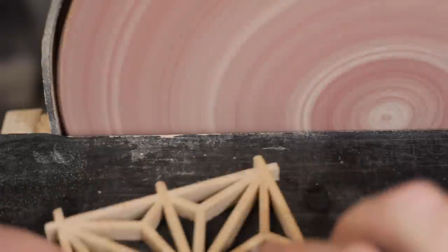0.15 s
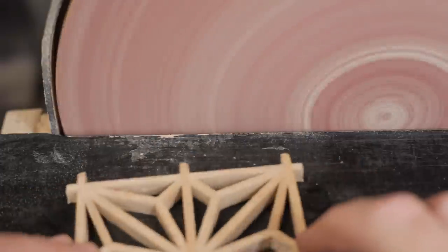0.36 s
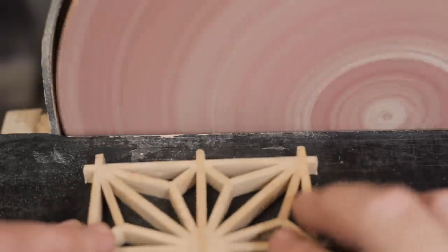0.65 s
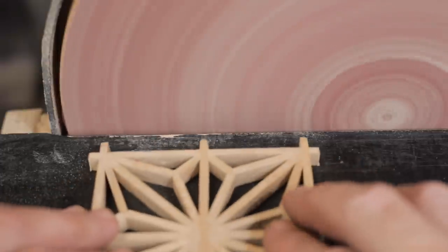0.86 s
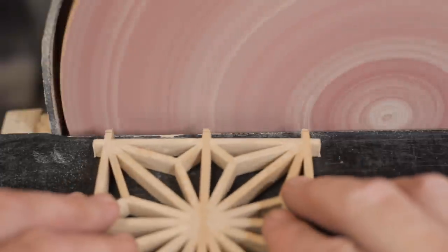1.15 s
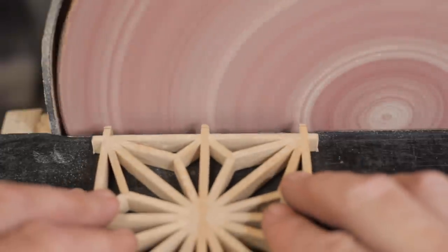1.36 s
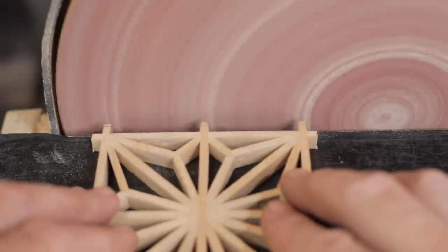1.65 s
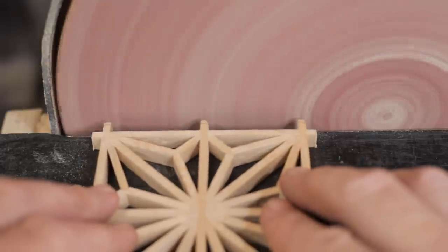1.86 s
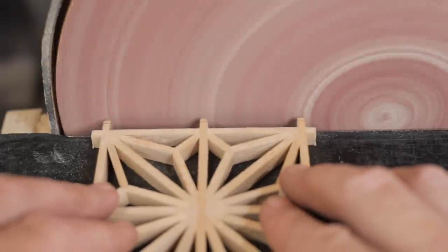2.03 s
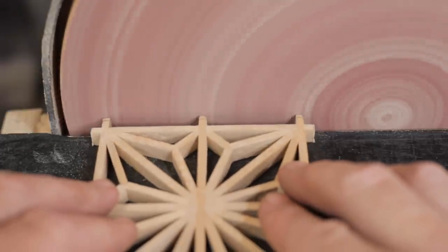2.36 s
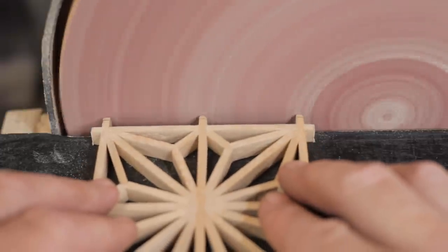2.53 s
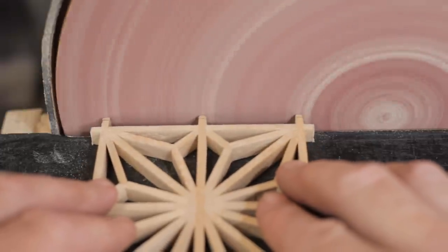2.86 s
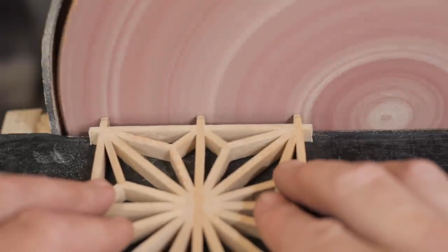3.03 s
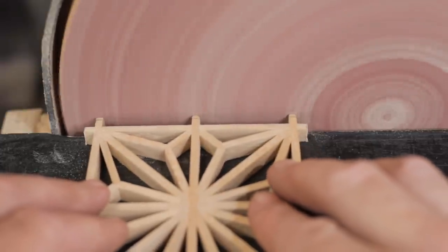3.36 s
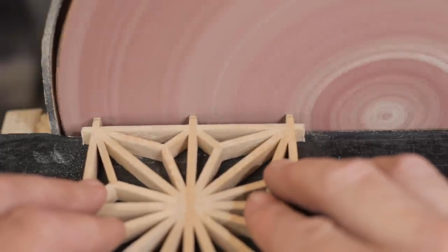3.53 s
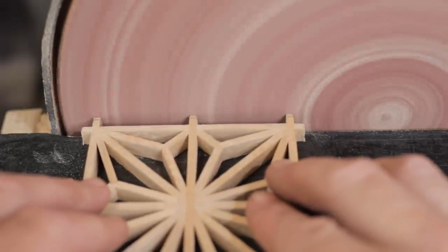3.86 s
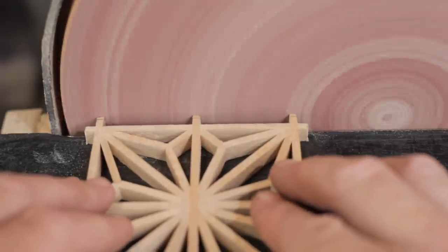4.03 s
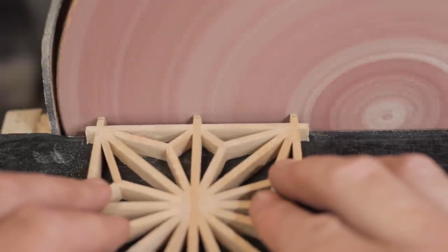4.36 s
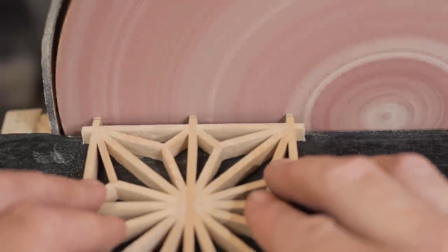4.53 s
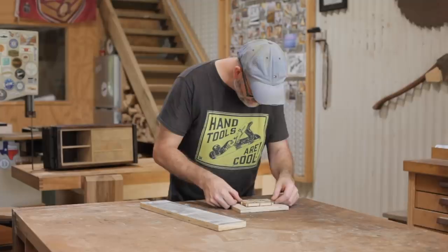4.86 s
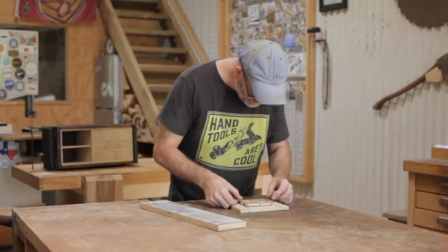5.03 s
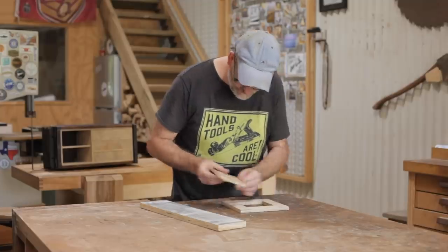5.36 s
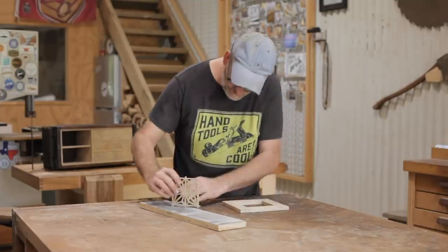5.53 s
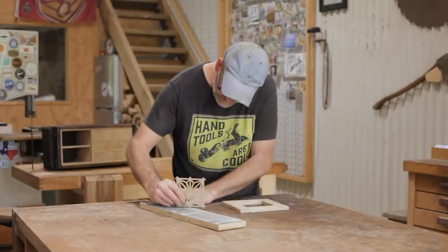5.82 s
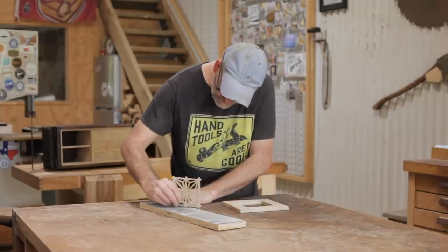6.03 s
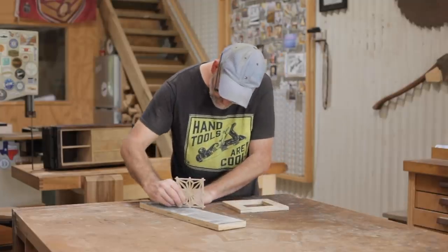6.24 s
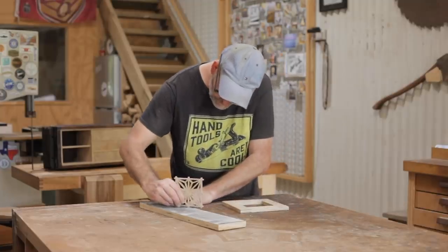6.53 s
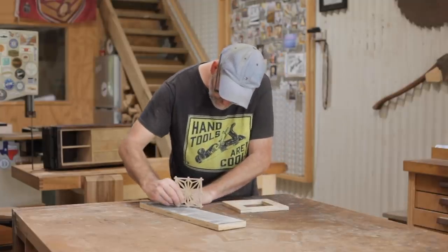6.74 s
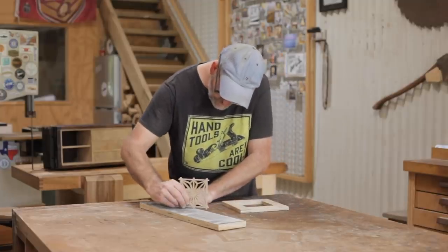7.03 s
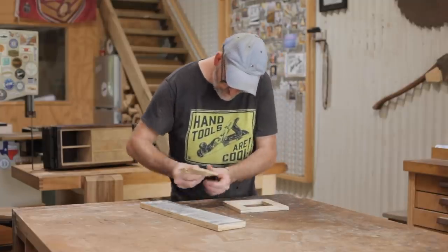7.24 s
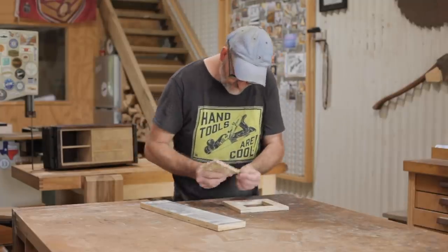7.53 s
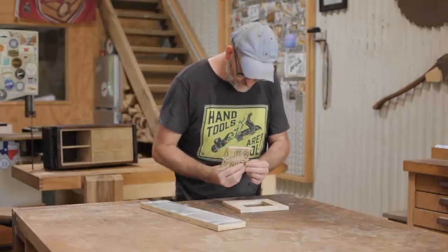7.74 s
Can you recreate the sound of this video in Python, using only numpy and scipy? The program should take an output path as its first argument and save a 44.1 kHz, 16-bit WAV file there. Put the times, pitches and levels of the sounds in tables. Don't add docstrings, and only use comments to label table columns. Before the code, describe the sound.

An idling sanding machine whirs up close with tiny bright crackles of wood sliding. Then loud gritty sanding bursts in, chattering evenly as the disc's high spot hits the thin wood. It cuts to a calm room with faint rumble and a fan winding down; a light frame is tapped on a board, rubbed to and fro by hand in quick raspy strokes, then flicked clean.

```python
import sys
import numpy as np
from scipy import signal
from scipy.fft import rfft, irfft, next_fast_len
from scipy.io import wavfile
from scipy.ndimage import uniform_filter1d, map_coordinates

SR = 44100
rng = np.random.default_rng(int(sys.argv[2]) if len(sys.argv) > 2 else 0)


def attenuation_scalar(level_db):
    decades = np.asarray(level_db, float) / 20
    return 10 ** decades


def to_wav(s):
    ch = np.atleast_2d(s).T
    pcm = np.round(np.clip(ch, -1, 1) * 32767)
    wavfile.write(sys.argv[1], SR, pcm.astype(np.int16))


N = 347949
TIME_S = np.arange(N) / SR
TURN_HZ = 13.17
FIRST_STRIKE_S = 2.289


def unit(x):
    return x / np.sqrt(np.mean(x ** 2) + 1e-20)


def along(points, hz):
    f, v = np.transpose(points)
    return np.interp(np.log(hz + 1), np.log(f + 1), v)


def curves(rows):
    s, *cols = np.transpose(rows)
    return [np.interp(TIME_S, s, c) for c in cols]


def wobble(rate_hz):
    knots = rng.standard_normal(int(N * rate_hz / SR) + 4)
    return map_coordinates(knots, [np.arange(N) * rate_hz / SR])


def filtered(x, response):
    m = next_fast_len(N + 8192)
    return irfft(rfft(x, m) * response(np.fft.rfftfreq(m, 1 / SR)), m)[:N]


def peaks(modes, hz):
    power = sum(attenuation_scalar(db) ** 2 / (1 + (2 * (hz - c) / w) ** 2) for c, w, db in modes)
    return np.sqrt(power)


def grains(spectrum, rough_db):
    white = rng.standard_normal(N) * attenuation_scalar(rough_db * wobble(900))
    return unit(filtered(white, lambda hz: attenuation_scalar(along(spectrum, hz))))


def swell(s, half_s, power):
    return np.cos(np.pi / 2 * np.clip((TIME_S - s) / half_s, -1, 1)) ** power


def motor():
    # multiple, level_db
    hum_orders = [(1, 0.65), (2, -15.5), (3, -27), (4.5, -21.5), (7, -20), (7.5, -19.5)]
    # freq_hz, level_db_per_hz
    whir_spectrum = [(35, -31.5), (72, -15), (102, -16.5), (150, -22), (344, -21), (700, -22.5),
                     (1200, -24), (1700, -16), (2700, -21), (3300, -13.5), (3470, -26), (4300, -33.5),
                     (6500, -41), (9800, -47.5), (16000, -51.5)]
    # freq_hz, width_hz, over_whir_db
    housing = [(239, 14.6, 13), (454, 5.7, 6.5), (529, 18, 8.5), (609.5, 29, 14.5), (739.4, 15, 12),
               (796, 12, 10.5), (928, 73, 8), (1002, 13, 11.5), (1088, 22, 14), (1160, 12, 7),
               (1290, 31, 16.5), (1420, 53, 5.5), (1590, 85, 6), (1800, 53, 2), (2050, 83, 6),
               (2410, 230, 3.5), (2840, 94, 9.5), (2990, 240, -2), (3540, 51, 4), (3720, 60, 10),
               (4020, 62, 9.5), (4410, 150, 7), (5870, 340, 6.5), (7000, 150, 8.5), (7780, 300, 6),
               (8200, 500, 6.5)]
    hum_hz, hum_db, sag_db, sag_s = 99.73, -35, -4.5, 0.43
    phase = 2 * np.pi * hum_hz * TIME_S + 2.55
    hum = sum(attenuation_scalar(db + .5 * k * wobble(12)) * np.cos(k * phase) for k, db in hum_orders)
    whir = filtered(rng.standard_normal(N),
                    lambda hz: attenuation_scalar(along(whir_spectrum, hz)) * np.hypot(1, peaks(housing, hz)))
    sag = 1 - np.exp(-np.clip(TIME_S - FIRST_STRIKE_S, 0, None) / sag_s)
    return attenuation_scalar(hum_db + sag_db * sag) * hum + attenuation_scalar(-37.5 + 0.49 * wobble(7.98)) * unit(whir)


def sliding():
    # start_s, peak_db
    ticks = [(0.1266, -45), (0.2189, -43), (0.2962, -47), (0.4394, -49), (0.5137, -53), (0.7332, -52),
             (0.817, -49), (0.8839, -50), (1.0495, -49), (1.1014, -53), (1.271, -46), (1.3204, -52),
             (1.3409, -45), (1.4411, -52), (1.491, -46), (1.5554, -44), (1.7325, -55), (1.8053, -53),
             (1.8652, -52), (1.952, -52), (2.0782, -52), (2.0996, -45)]
    # middle_s, half_length_s, level_db
    shoves = [
        (0, 0.042, -57),
        (0.827, .04, -58),
        (1.0, 0.17, -73),
        (1.6, 0.3, -74),
        (2.1, 0.089, -73),
        (2.276, 0.06, -61),
    ]
    specks_per_s, specks_db, tick_t60_s = 40, -57.5, 0.047
    gate, t = np.zeros(N + SR), np.arange(SR // 20) / SR
    chance = rng.random((round(specks_per_s * FIRST_STRIKE_S), 2))
    specks = [(FIRST_STRIKE_S * u, specks_db + 6 * v) for u, v in chance]
    for s, db in ticks + specks:
        gate[round(s * SR):][:len(t)] += attenuation_scalar(db - 4.5 - 60 * t / tick_t60_s)
    drag = sum(attenuation_scalar(db) * swell(s, half_s, power=.7) for s, half_s, db in shoves)
    drag = drag * attenuation_scalar(-3.5 + 4.6 * wobble(39.7))
    return (gate[:N] + drag) * grains([(3000, -7), (6000, 6.5), (13000, -7.5), (16000, -11)], rough_db=2.5)


def held(light, firm, grip, rough_db):
    grip = np.clip(grip, 0, 1)
    mix = np.sqrt(1 - grip) * grains(light, rough_db) + np.sqrt(grip) * grains(firm, rough_db)
    z = signal.stft(mix, nperseg=512)[2]
    drift = uniform_filter1d(rng.standard_normal(z.shape), size=6, axis=0)
    drift = uniform_filter1d(drift, size=16, axis=1)
    return unit(signal.istft(z * attenuation_scalar(.9 * unit(drift)), nperseg=512)[1][:N])


def runout(turns):
    # at_turn_share, width_turn_share, grit_db, body_db
    bounces = [
        (.065, .035, -7.5, -7),
        (.6, 0.022, -6, 1),
    ]
    high_share, high_db, low_db, body_swing = 0.51, 1.63, -3, .25
    share = turns % 1
    low = np.clip((share - high_share) / 0.025, 0, 1) * np.clip((1 - share) / 0.033, 0, 1)
    face = high_db + (low_db - high_db) * low
    clear = [np.exp(-((share - at) / width) ** 2) for at, width, *_ in bounces]
    grit = face + sum(c * row[2] for c, row in zip(clear, bounces))
    body = body_swing * face + sum(c * row[3] for c, row in zip(clear, bounces))
    return grit, body


def strikes(turns, grip, slack_db, uneven, wood, cut, fine):
    # freq_hz, level_db
    burst_light = [(300, -30), (700, -33), (1500, -1), (2050, -2), (2400, 1.5), (2750, 12.5), (3000, -10),
                   (3300, 7), (3800, -6.5), (5000, -11), (9000, -13)]
    # freq_hz, level_db
    burst_firm = [(300, -53), (700, -15), (1500, -2), (2050, 6), (2400, 0), (2750, 2), (3200, 2), (3730, 4),
                  (4200, 0.5), (5500, -38), (9000, -11)]
    strike_db, first_hit_db, snap_db, snap_s = -27, 3.5, -27, .0025
    bright_db, dulls_db, free_db = -7.5, -5, 0.42
    turn = np.clip(np.round(turns).astype(int), 0, None)
    luck = rng.standard_normal((N // 3000, 2))[turn]
    since_s = (turns - np.round(turns)) / TURN_HZ - 0.00036 * luck[:, 0] * (turn > 0)
    rising = np.clip((since_s + .0095) / .009, 0, 1)
    burst = np.where(since_s < .0025, rising, attenuation_scalar(-60 * (since_s - .0025) / .014))
    started = turns > -.5
    strength = attenuation_scalar(strike_db + first_hit_db * (turn == 0) + .4 * luck[:, 1]) * burst * started
    knock = held(burst_light, burst_firm, grip, rough_db=1.2)
    knock = knock / np.sqrt(np.abs(uniform_filter1d(knock ** 2, size=350)) + .05)
    hiss_db = bright_db + dulls_db * grip + free_db * slack_db
    strike = strength * (knock + attenuation_scalar(hiss_db) * (cut + 1.18 * wood))
    snap = attenuation_scalar(snap_db) * uneven * np.exp(-(since_s / snap_s) ** 2) * started * fine
    return strike + snap


def frame_shake(turns):
    # disc_order, level_db
    orders = [(4, -65), (5, -78), (6, -71), (7, -46), (8, -88), (9, -63), (10, -64), (11, -57), (12, -61),
              (13, -58), (17, -58.5), (19, -59), (21, -62), (22, -55), (25, -62.5), (29, -56.5),
              (30, -76.5)]
    load = np.clip((TIME_S - 2.3) / 0.28, 0, 1)
    return load * sum(attenuation_scalar(db + 3 + 1.5 * wobble(3)) * np.cos(2 * np.pi * k * (turns + .024))
                      for k, db in orders)


def sanding():
    # time_s, lag_ms
    lag = [(2.3, 0), (2.9, 0.7), (3.1, 0.5), (3.7, -1.3), (4.3, 0.5), (5.1, 2.5)]
    # time_s, feed_pressure_db, grip_0_to_1, rocking_with_disc_wobble
    contact = [
        (2.29, -36.5, .02, 0.86),
        (2.44, -32, 0, 1.2),
        (2.54, -26, 0.12, 1),
        (2.9, -25, 0.28, 0.66),
        (3.75, -24.5, .85, 0.73),
        (4.0, -23.5, 0.86, 0.15),
        (4.45, -23, 0.91, 0.53),
        (4.7, -24.5, 0.93, 0.46),
        (5.06, -26, 1, 1.1),
    ]
    # freq_hz, level_db_per_hz
    body_light = [(150, -15), (260, -8), (600, -11), (1100, -14), (2300, -8), (3300, 0.1), (4400, -3.5),
                  (5050, 2), (5500, -1.5), (5950, -6), (6700, 1), (7450, -9), (8000, -5), (10400, -30)]
    # freq_hz, level_db_per_hz
    body_firm = [(88, -27), (150, -18.5), (282, -6), (481, -15), (729, -6.5), (846, -24), (1180, -30.5),
                 (1280, -18), (2010, -6.5), (2410, -9), (3780, 2), (4110, -1.5), (7480, 1), (8000, 1.5),
                 (10400, -2), (17600, -120)]
    # freq_hz, level_db_per_hz
    grit_light = [(5000, -30), (7300, -8), (7560, -13), (8300, 1), (8900, 1), (9750, -6), (11250, 3),
                  (12300, -8), (13400, -3), (14500, -10), (15200, -7), (15800, -12)]
    # freq_hz, level_db_per_hz
    grit_firm = [(5000, -28), (7200, -7), (7500, -14), (8400, 1.5), (8950, .5), (9500, -3.5), (11300, 1),
                 (12250, -4.5), (13300, 0), (14500, -5.5), (15300, -4), (15800, -7)]
    full_feed_db, body_full_db, body_db_per_db = -25, -28, 0.21
    turns = TURN_HZ * (TIME_S - FIRST_STRIKE_S - curves(lag)[0] / 1000)
    grit_db, grip, uneven = curves(contact)
    slack_db = full_feed_db - grit_db
    body_db = body_full_db - body_db_per_db * slack_db
    grit_swing, body_swing = runout(turns)
    wood = held(body_light, body_firm, grip, rough_db=2.0)
    cut = held(grit_light, grit_firm, grip, rough_db=0.75)
    body = attenuation_scalar(body_db + uneven * body_swing + .8 * wobble(90)) * wood
    swing_db = uneven * grit_swing
    fine = filtered(cut, lambda hz: 1 / (1 + (9600 / (hz + 1)) ** 16))
    fine, rest = fine, cut - fine
    grit = attenuation_scalar(1.45 * swing_db) * fine + attenuation_scalar(.8 * swing_db) * rest
    grit = attenuation_scalar(grit_db + .8 * wobble(90)) * grit
    touch = np.clip((TIME_S - 2.306) / 0.0077, 0, 1)
    strike = strikes(turns, grip, slack_db, uneven, wood, cut, fine)
    return touch * (body + grit) + strike + frame_shake(turns)


def workshop():
    # freq_hz, level_db_per_hz
    room = [(12, -77), (20, -42), (114, -2), (140, -5.5), (233, -9.5), (388, -26), (735, -28.5),
            (1230, -34), (1430, -26.5), (2260, -30), (2780, -27.5), (3080, -31.5), (6970, -32), (9000, -46),
            (11700, -76), (19800, -120)]
    # time_s, pitch_hz, level_db
    fan_course = [(5.0, 132, -66), (5.6, 131.8, -67), (6.9, 119, -67), (7.4, 116, -63),
                  (7.89, 115.4, -61.5)]
    # freq_hz, level_db
    mic_noise = [(200, 5), (1500, -1.5), (6500, -8), (9000, -6), (14500, -7), (15300, -5), (15800, -17)]
    tone = filtered(rng.standard_normal(N), lambda hz: attenuation_scalar(along(room, hz)))
    low = filtered(tone, lambda hz: 1 / (1 + (hz / 350) ** 8))
    fan_hz, fan_db = curves(fan_course)
    rise_db = fan_db - fan_db[0]
    phase = 2 * np.pi * np.cumsum(fan_hz + 1.5 * wobble(20)) / SR
    fan = attenuation_scalar(fan_db + 3 + 1.5 * wobble(15)) * np.sin(phase)
    rumble = attenuation_scalar(-66 + 1.67 * rise_db) * unit(low)
    air = attenuation_scalar(-68 + rise_db) * unit(tone - low)
    hiss = attenuation_scalar(-65 + .3 * rise_db) * grains(mic_noise, rough_db=-0.2)
    return rumble + air + fan + hiss


def strokes():
    # middle_s, level_db, half_length_s, board_share_db
    tries = [
        (5.24, -70, .07, -12),
        (5.765, -63, 0.047, -2),
        (5.897, -55.5, 0.067, -5),
        (6.02, -51.5, 0.054, -0.5),
        (6.119, -55, 0.048, -1.5),
    ]
    # freq_hz, level_db_per_hz
    paper = [(1300, -51), (2200, -11.5), (3400, -9.5), (3900, -10.5), (4700, -7.5), (5730, -1), (6500, -6),
             (7400, -11), (8700, -15), (9500, -11), (10800, -16.5), (12100, -10.5), (13500, -16),
             (16000, -23)]
    # freq_hz, width_hz, level_db
    board_modes = [(446, 38, 1), (950, 120, -6), (1310, 110, -2.5), (1650, 240, -1.5), (1960, 110, -6)]
    # freq_hz, width_hz, level_db
    sing_modes = [(5700, 840, 0)]
    from_s, to_s, rubs_n, rub_half_s = 6.207, 7.13, 11, 0.047
    rub_db, grows_db, push_db = -54.5, 4.5, 0.5
    share_db, share_falls_db = -3.5, -2
    sing_db, sing_power, echo_db, echo_s = -5.5, 1.8, -15, .1
    rubs = []
    for k, u in enumerate(np.linspace(0, 1, rubs_n)):
        stroke_db = rub_db + grows_db * u ** 2 + push_db * (-1) ** k
        rubs.append((from_s + u * (to_s - from_s), stroke_db, rub_half_s, share_db + share_falls_db * u))
    moves = tries + rubs
    speeds = [attenuation_scalar(db) * swell(s, 1.4 * half_s, power=2.76) for s, db, half_s, _ in moves]
    speed = sum(speeds)
    board_noise = rng.standard_normal(N) * attenuation_scalar(1.9 * wobble(300))
    board = unit(filtered(board_noise, lambda hz: peaks(board_modes, hz)))
    pressed = sum(attenuation_scalar(row[3]) * v for row, v in zip(moves, speeds))
    near = speed * attenuation_scalar(0.81 * wobble(80)) * grains(paper, rough_db=1.0) + pressed * board
    sing = unit(filtered(rng.standard_normal(N), lambda hz: peaks(sing_modes, hz) ** 2))
    sing = attenuation_scalar(sing_db + rub_db) * (speed / attenuation_scalar(rub_db)) ** sing_power * sing
    t = np.arange(SR // 2) / SR
    tail = rng.standard_normal(len(t)) * np.exp(-t / echo_s)
    echo = signal.fftconvolve(near, tail / np.linalg.norm(tail))[:N]
    return near + sing + attenuation_scalar(echo_db) * echo


def taps():
    # start_s, crack_db, lattice_db, own_ring_hz, own_ring_db
    knocks = [
        (5.164, -59, -32, 3130, -4),
        (5.267, -54.5, -31, 2860, 7.5),
        (5.577, -37, -6.5, 3020, -25),
        (6.1685, -43.5, -12, 1530, -6),
        (6.272, -41, -12, 212, -9),
        (7.002, -51.5, -5, 1490, -10),
        (7.585, -58, -6, 750, 5),
        (7.626, -65, -6, 423, 12),
        (7.647, -63, -9, 421, 11),
        (7.719, -51, -28, 7540, -5),
    ]
    # freq_hz, level_db, t60_s
    lattice = [(457, -3, 0.13), (520, -4, .06), (735, -5.5, 0.1), (925, -5, 0.057), (1180, -1, 0.037),
               (1480, 2, 0.029), (2000, -1, 0.033)]
    crack_t60_s, tail_db, tail_t60_s, ring_rise_s = 0.018, -11, 0.35, 0.00069
    out, t = np.zeros(N + SR), np.arange(SR // 3) / SR
    soft = signal.butter(2, [400, 5500], "band", fs=SR)
    for s, db, lattice_db, own_hz, own_db in knocks:
        white = rng.standard_normal((2, len(t))) + 6 * signal.unit_impulse(len(t), 4)
        noise = signal.lfilter(*soft, white)
        modes = [(f, lattice_db + mode_db, t60_s) for f, mode_db, t60_s in lattice]
        modes.append((own_hz, own_db, 3.3 / own_hz ** 0.51))
        ring = sum(attenuation_scalar(mode_db - 60 * t / t60_s) * np.sin(2 * np.pi * f * t) for f, mode_db, t60_s in modes)
        ring = ring * (1 - np.exp(-t / ring_rise_s))
        crack = attenuation_scalar(-60 * t / crack_t60_s) * noise[0]
        tail = attenuation_scalar(tail_db - 60 * t / tail_t60_s) * noise[1]
        out[round(s * SR):][:len(t)] += attenuation_scalar(db) * (ring + crack + tail)
    return out[:N]


def flick():
    # freq_hz, level_db
    dust = [(300, -7), (1200, -6), (3000, -2), (5000, 0), (7500, -7), (12000, -17), (16000, -18)]
    start_s, flick_db, t60_s = 7.571, -48.5, 0.3
    since_s = TIME_S - start_s
    sweep = (since_s > 0) * attenuation_scalar(flick_db - 60 * np.abs(since_s - .01) / t60_s)
    return sweep * grains(dust, rough_db=0.5)


def scene():
    from_s, to_s, bend = 4.965, 5.062, 1.25
    fade = np.clip((to_s - TIME_S) / (to_s - from_s), 0, 1)
    machine = motor() + sliding() + sanding()
    shop = workshop() + strokes() + taps() + flick()
    return (fade ** bend * machine + (1 - fade) * shop)[None]


def band_limit(x):
    return signal.sosfilt(signal.butter(12, 16630, fs=SR, output="sos"), x)


def record(dry):
    top_hz, edge_hz = 15790, 50
    mix = filtered(dry[0], lambda hz: np.sin(np.pi / 2 * np.clip((top_hz - hz) / edge_hz, 0, 1)))
    return band_limit(mix[None])


dry = scene()
out = record(dry)
to_wav(out)
```